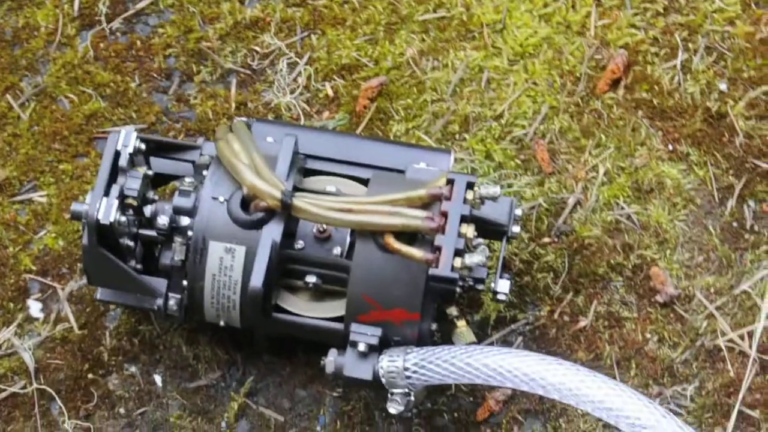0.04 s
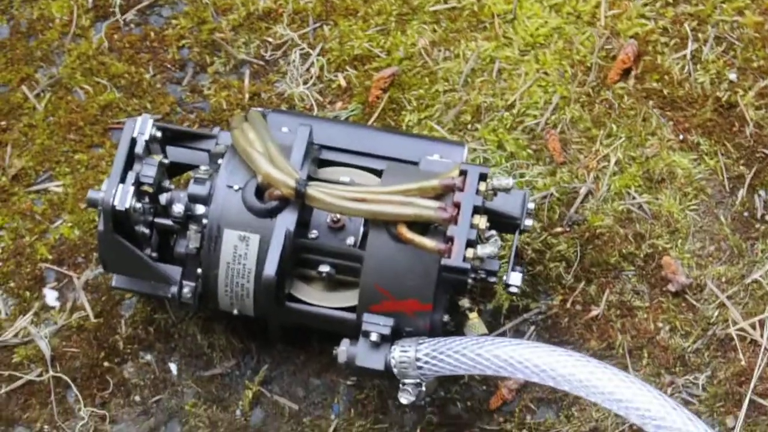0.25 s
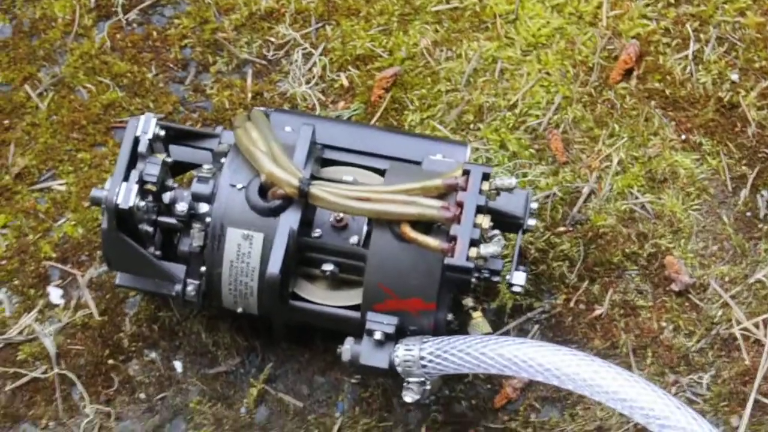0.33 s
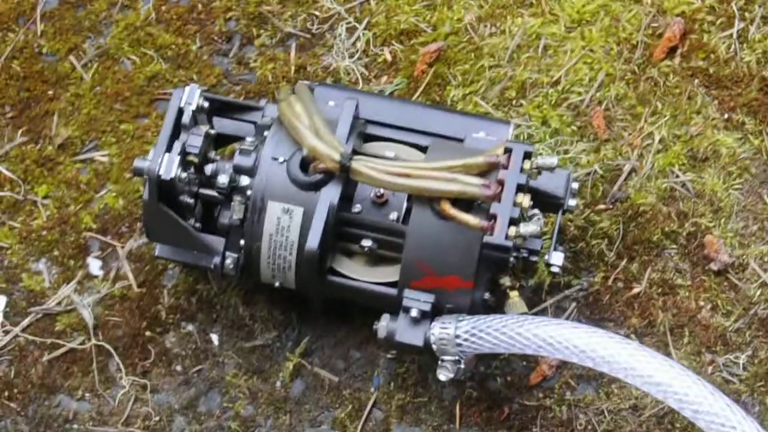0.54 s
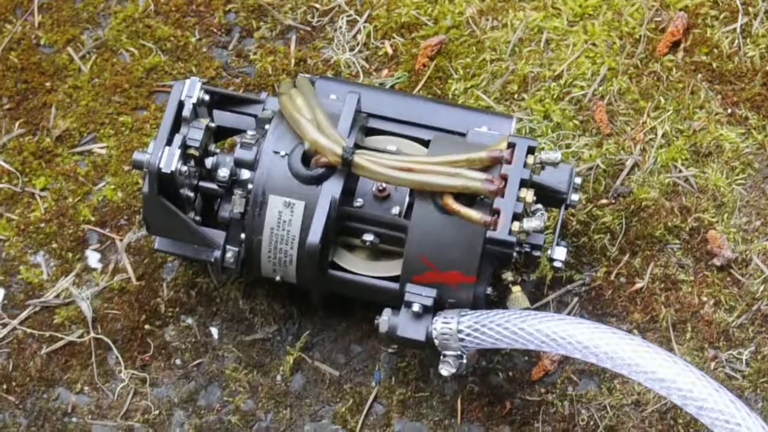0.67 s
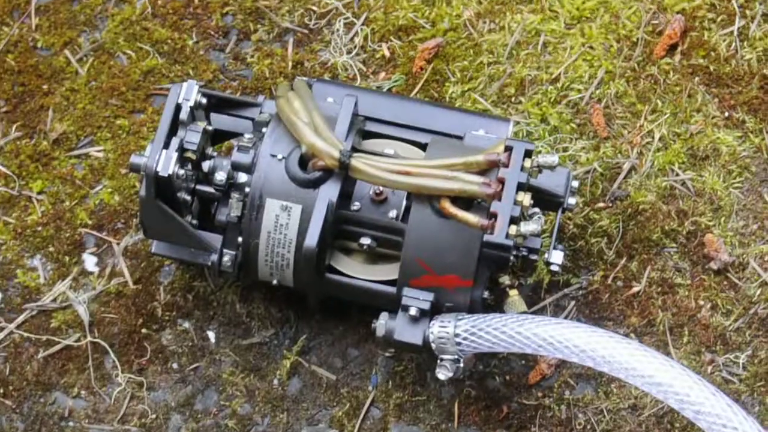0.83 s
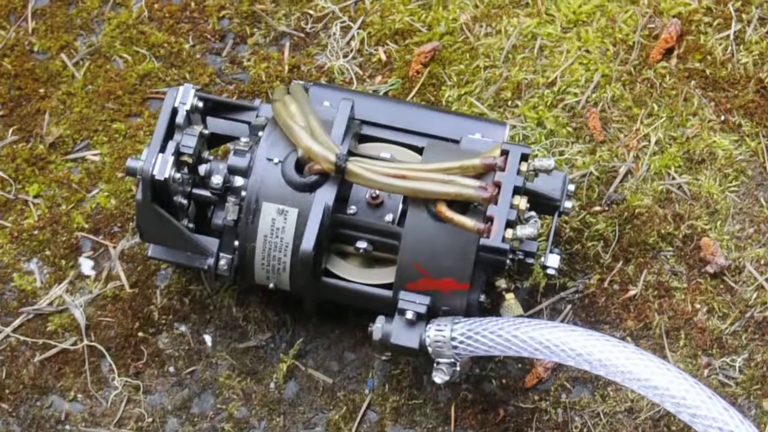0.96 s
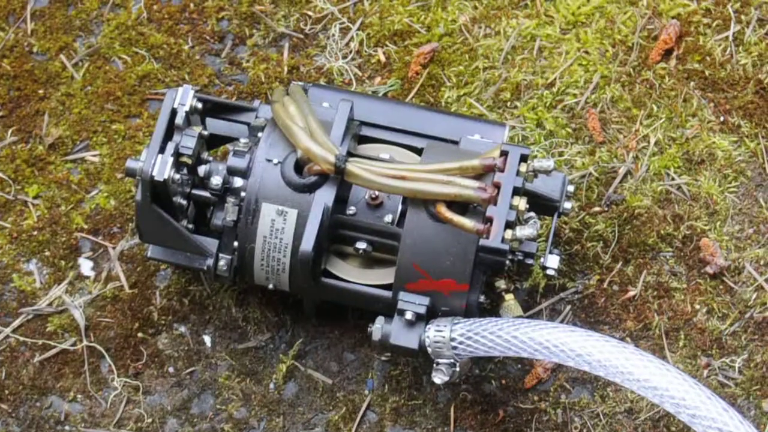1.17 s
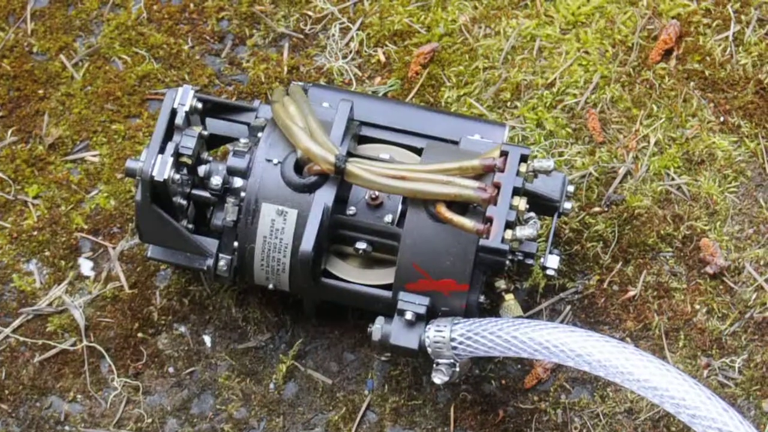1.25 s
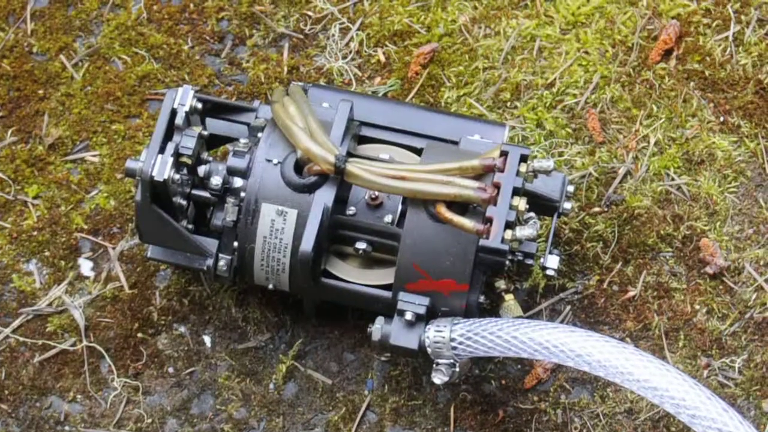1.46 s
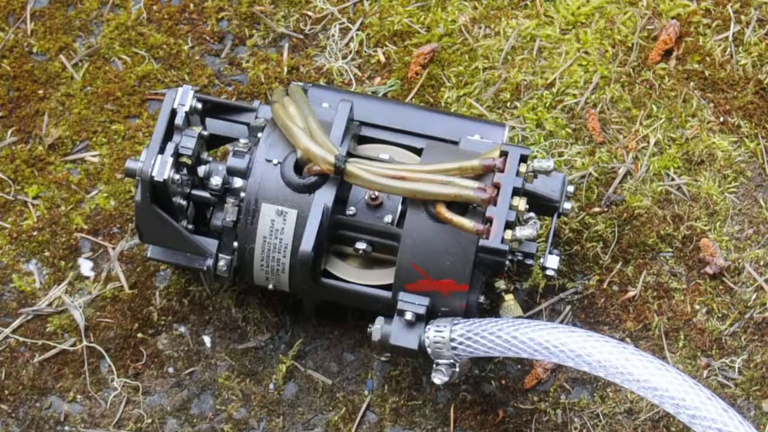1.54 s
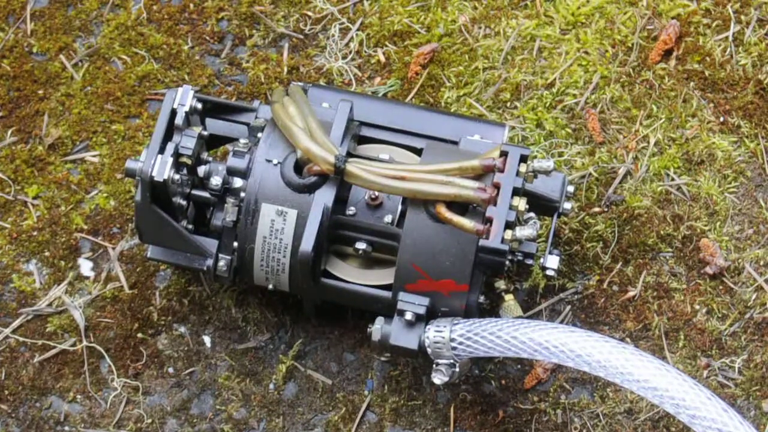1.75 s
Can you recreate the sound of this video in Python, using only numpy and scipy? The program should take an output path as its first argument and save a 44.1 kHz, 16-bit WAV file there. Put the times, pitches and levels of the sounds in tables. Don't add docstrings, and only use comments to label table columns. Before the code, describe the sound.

A small air-driven gyroscope spins close by outdoors, a steady humming whine under hissing air; in the first half second two hard low bumps overload the hand-held stereo microphone, mostly left, then handling fades.

```python
import sys
import numpy as np
from scipy import signal
from scipy.fft import rfft, irfft
from scipy.io import wavfile
from scipy.ndimage import uniform_filter1d

SR = 44100
rng = np.random.default_rng(int(sys.argv[2]) if len(sys.argv) > 2 else 0)


def waveform_to_disk(signal):
    frames = np.transpose(np.atleast_2d(signal))
    scaled = np.clip(frames, -1, 1) * 32767
    samples = np.round(scaled).astype(np.int16)
    wavfile.write(sys.argv[1], SR, samples)


def field_ratio(decibels):
    return 10 ** (np.asarray(decibels, dtype=float) / 20)


N = 79380

# frequency [Hz], lead [radians].
PORT_LEAD = [(100, 0), (2100, .3), (3300, .6), (5900, 1.6), (7500, 2.8), (10100, 3.15), (12400, 3.7),
             (15200, 4.3)]
# time [s], level [dB].
HAND_TREMOR = [(0, -42), (.15, -33.5), (.3, -32), (.45, -23), (.62, -34), (.8, -39), (.9, -47), (1.05, -36),
               (1.2, -51), (1.3, -56), (1.8, -55)]
# start [s], thump on both sides [dB], left mount ring [dB].
BUMPS = [
    (.2334, -3.1, 4.8),
    (.2687, -19.4, -10.4),
    (.4945, -3.2, 6.1),
    (.5297, -13.4, -17.9),
]
# start [s], thump on both sides [dB], left mount ring [dB].
JOLTS = [(0.016, -36.5, -35), (0.141, -40.5, -33), (0.332, -28, -33), (.414, -21, -21), (0.445, -37, -11),
         (.598, -33, -18.5), (0.671, -34.5, -22), (.74, -39, -26), (0.867, -40.5, -31), (.91, -42.5, -35),
         (.955, -38.5, -30)]
SWAY_SIDES = [
    [1],
    [-.42],
]
# start [s], level [dB].
RATTLES = [(0.271, -32), (.334, -38), (.541, -33), (.607, -43)]
# frequency [Hz], density [dB per Hz], left over right [dB].
JET_HISS = [(324, -84.5, 0.5), (866, -74.5, 0.5), (3560, -76.5, -4), (6400, -78, 0), (8600, -72.5, -2.7),
            (10700, -83, -1), (13400, -79.5, 1.5), (15700, -85, -1)]
# centre [Hz], width [Hz], density [dB per Hz], left over right [dB].
CAVITIES = [(1284, 98, -68.5, 10.5), (2140, 408, -68, 3), (2410, 110, -72.5, 2), (4823, 58, -59.5, -6),
            (4744, 396, -70, 2), (5730, 410, -79, -11), (7450, 400, -88, -22), (8200, 190, -70.5, 4),
            (9400, 1200, -81, 8.5), (10050, 250, -73, 6), (11700, 570, -76, 6), (14100, 840, -87, 4)]
# multiple of the turn, level [dB], left over right [dB].
ROTOR_TONES = [(2, -64, -6), (3, -51, 3), (4, -45, 4), (5, -57, -1), (6, -41, 2), (7, -48, -1), (8, -38, 1),
               (9, -56, -8), (10, -42, 1), (11, -59, -7), (12, -50, -1), (13, -58, 1), (14, -45, -4),
               (15, -51, 0), (16, -43, -3), (17, -55, -7), (18, -58, -10), (19, -52, -6), (20, -59, -3),
               (21, -56, 0), (22, -55, 2), (24, -55, -2), (26, -61, -5), (28, -58, 6)]
# time [s], level [dB].
BUCKET_WHISTLE = [(0, -57), (.15, -51), (.5, -54), (.7, -48), (1.1, -47), (1.8, -45)]

SPIN_HZ, SAG_HZ_PER_S, SAG_EASE_HZ_PER_S2 = 317.5, -5.4, .1


def sides(pan_db):
    return field_ratio(np.array([[.5], [-.5]]) * pan_db)


def curve(table):
    return np.interp(np.arange(N) / SR, *np.array(table).T)


def walk(rate):
    hold = int(SR / rate)
    steps = np.repeat(rng.standard_normal(400), hold)[:N]
    return np.sqrt(2) * uniform_filter1d(uniform_filter1d(steps, hold), hold)


def lead(hz):
    return np.interp(hz, *np.array(PORT_LEAD).T)


def air(gain, diffuse_db):
    hz = np.fft.rfftfreq(N, 1 / SR)
    direct, left, right = rfft(rng.standard_normal((3, N)))
    late = np.exp(-1j * lead(hz))
    share = field_ratio(diffuse_db)
    pair = np.array([direct + share * left, direct * late + share * right]) / np.sqrt(1 + share ** 2)
    return irfft(pair * gain(hz) * np.sqrt(SR / 2), N)


def outdoor_rumble():
    return air(lambda hz: field_ratio(-68) / (1 + (hz / 55.3) ** 2), 0)


def hand_tremor():
    low_hz = 22.2
    shake = air(lambda hz: hz / low_hz / (1 + (hz / low_hz) ** 4), 3)
    return shake / shake.std() * field_ratio(curve(HAND_TREMOR) + 2.6 * walk(9)) * sides(1.5)


def lobe(u, peak_s, hz):
    return u / peak_s * np.exp(1 - u / peak_s) * np.sin(2 * np.pi * hz * u)


def camera_jolts():
    mount_hz, mount_lag_s, mount_rise_s, mount_t60_s = 47.15, .0072, .0097, .25
    sway_hz, sway_lag_s, sway_peak_s, sway_db = 15.5, .0057, .045, -21.5
    shudder_hz, shudder_width_hz, shudder_t60_s, shudder_db = 157, 41, .17, -23.5
    t = np.arange(N) / SR
    out = np.zeros((2, N))
    shudder = 0
    for at, thump_db, mount_db in BUMPS + JOLTS:
        u = np.maximum(t - at, 0)
        out += field_ratio(thump_db) * sides(1.1) * lobe(u, peak_s=.0115, hz=66.2)
        sway = lobe(np.maximum(u - sway_lag_s, 0), sway_peak_s, sway_hz)
        out += field_ratio(mount_db + sway_db) * np.array(SWAY_SIDES) * sway
        u = np.maximum(u - mount_lag_s, 0)
        rise = 1 - np.exp(-u / mount_rise_s)
        out[0] -= field_ratio(mount_db - 60 * u / mount_t60_s) * rise * np.sin(2 * np.pi * mount_hz * u)
        shudder = shudder + field_ratio(thump_db + shudder_db - 60 * u / shudder_t60_s) * rise
    casing = air(lambda hz: 1 / (1 + ((hz - shudder_hz) / shudder_width_hz) ** 2), 0)
    return out + shudder * sides(3.3) * casing / casing.std()


def casing_rattles():
    rattle_hz, t60_s = 400, .017
    t = np.arange(N) / SR
    out = np.zeros((2, N))
    for at, db in RATTLES:
        u = np.maximum(t - at, 0)
        out += field_ratio(db - 60 * u / t60_s) * sides(16) * np.sin(2 * np.pi * rattle_hz * u)
    return out


def jet(turns):
    throb_depth, flicker_db, flicker_per_s, fade_db_per_s = .04, .4, 25, -.15
    at, db, pan = np.array(JET_HISS).T

    def read(hz, values):
        return np.interp(np.log(hz + 1), np.log(at), values)

    hiss = air(lambda hz: field_ratio(read(hz, db)) * sides(read(hz, pan)), -2.5)
    out = hiss * (1 + throb_depth * np.sin(2 * np.pi * turns))
    for centre, width, level_db, pan_db in CAVITIES:
        ring = air(lambda hz: 1 / (1 + ((hz - centre) / width) ** 2), -24.5)
        out = out + ring * field_ratio(level_db + flicker_db * walk(flicker_per_s)) * sides(pan_db)
    return out * field_ratio(fade_db_per_s * (np.arange(N) - N / 2) / SR)


def rotor_tone(turns, multiple, level_db, pan_db):
    waver_db, waver_per_s = 1.2, 30
    late = np.array([[0], [1]]) * lead(multiple * SPIN_HZ)
    tone = np.sqrt(2) * np.sin(2 * np.pi * (multiple * turns + rng.random()) - late)
    return field_ratio(level_db + waver_db * walk(waver_per_s)) * sides(pan_db) * tone


def rotor(turns):
    hum = sum(rotor_tone(turns, round(k), db, pan) for k, db, pan in ROTOR_TONES)
    return hum + rotor_tone(turns, 48, curve(BUCKET_WHISTLE), 7)


def scene():
    t = np.arange(N) / SR
    turns = np.cumsum(SPIN_HZ + SAG_HZ_PER_S * t + SAG_EASE_HZ_PER_S2 * t ** 2) / SR
    handling = hand_tremor() + camera_jolts() + casing_rattles()
    return outdoor_rumble() + handling + jet(turns) + rotor(turns)


def band_limit(x):
    return signal.sosfilt(signal.butter(12, 15650, fs=SR, output="sos"), x)


def record(dry):
    clipped = np.clip(dry, -.999, .999)
    return band_limit(clipped)


dry = scene()
out = record(dry)
waveform_to_disk(out)
```